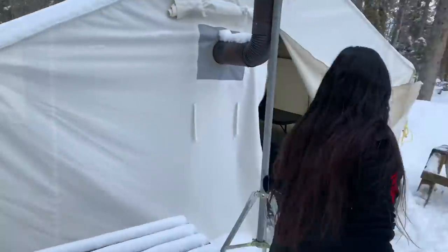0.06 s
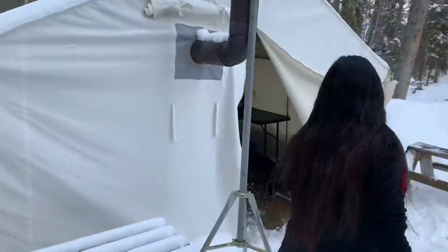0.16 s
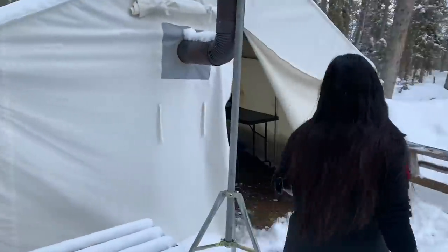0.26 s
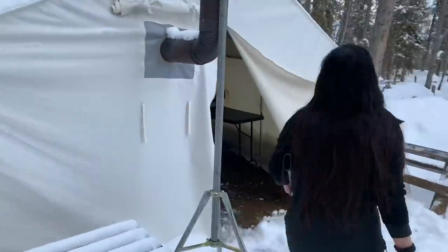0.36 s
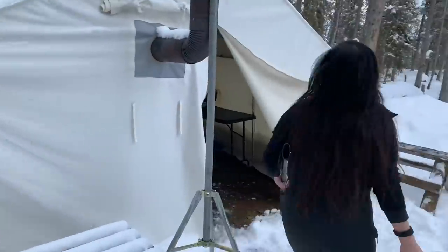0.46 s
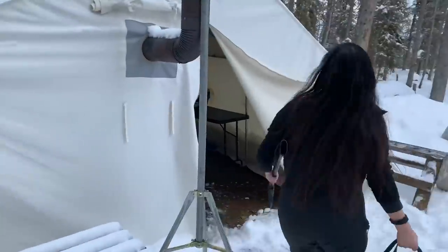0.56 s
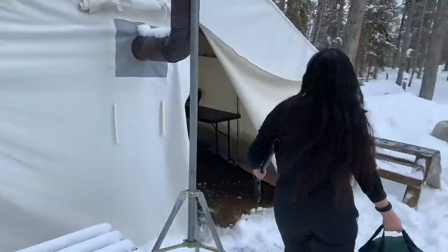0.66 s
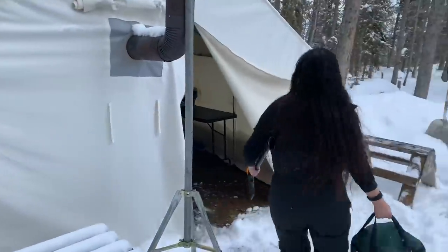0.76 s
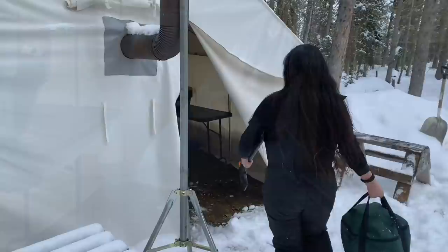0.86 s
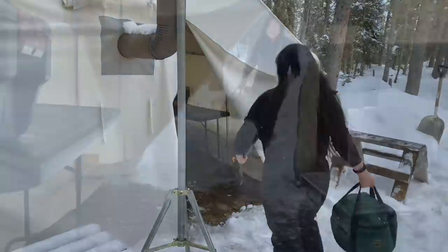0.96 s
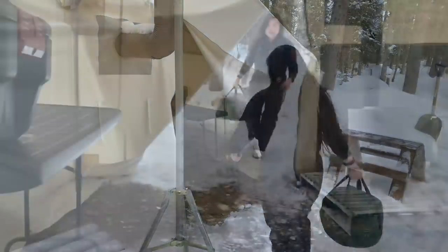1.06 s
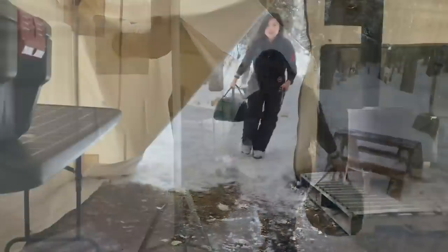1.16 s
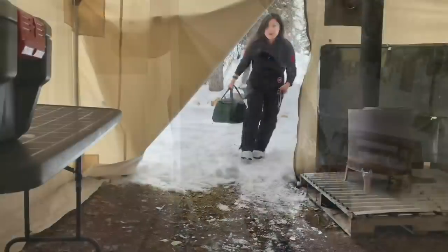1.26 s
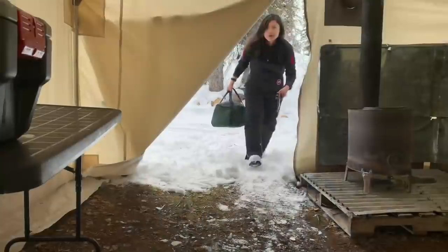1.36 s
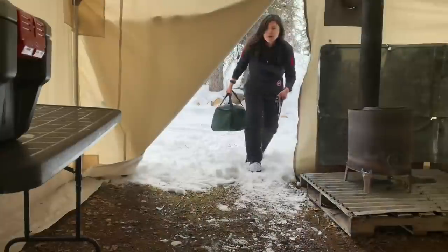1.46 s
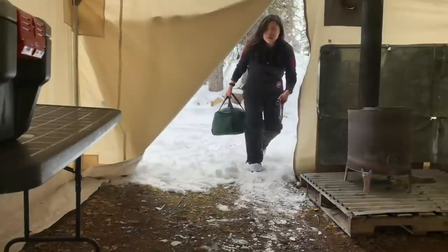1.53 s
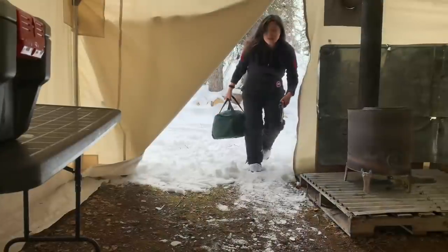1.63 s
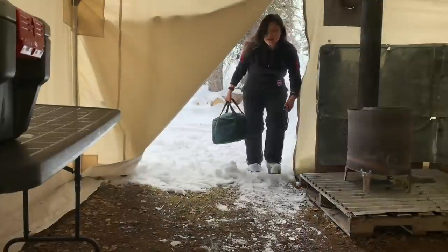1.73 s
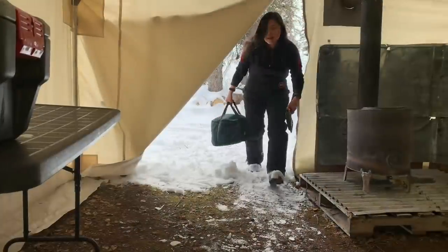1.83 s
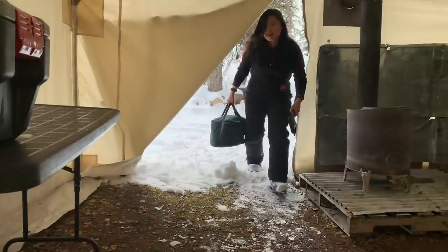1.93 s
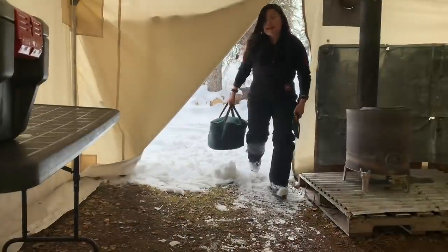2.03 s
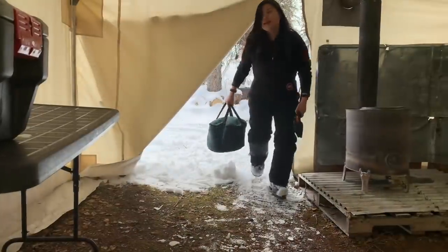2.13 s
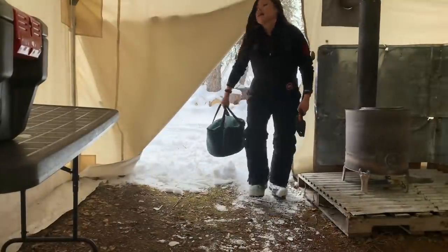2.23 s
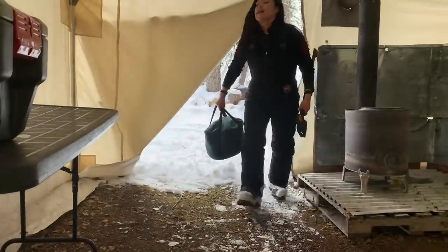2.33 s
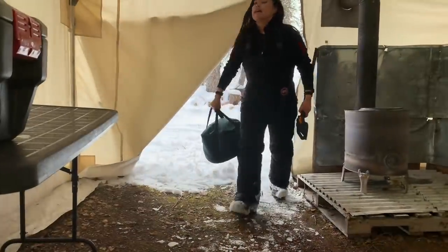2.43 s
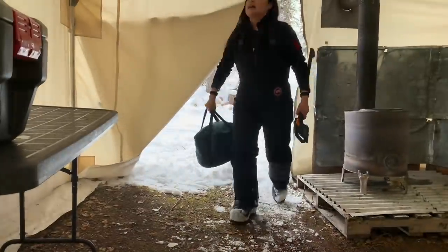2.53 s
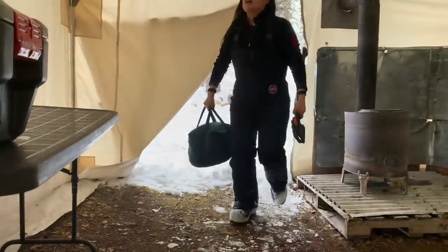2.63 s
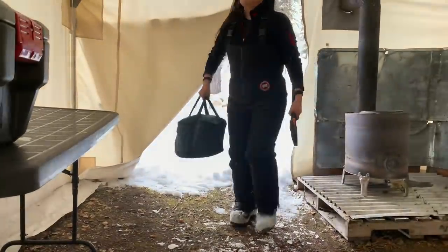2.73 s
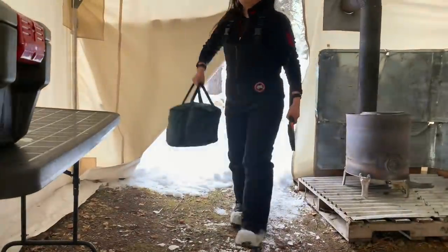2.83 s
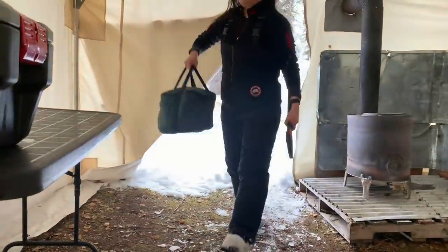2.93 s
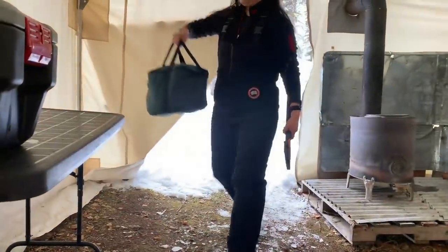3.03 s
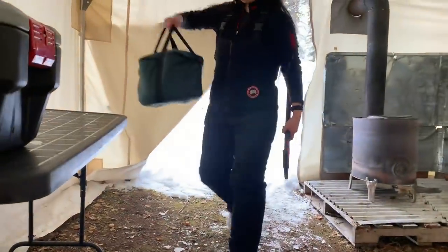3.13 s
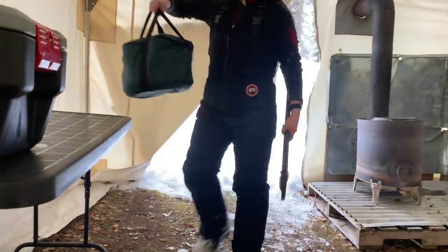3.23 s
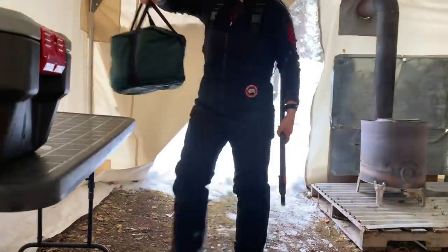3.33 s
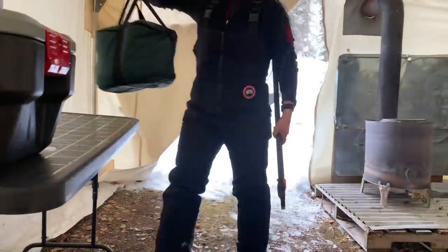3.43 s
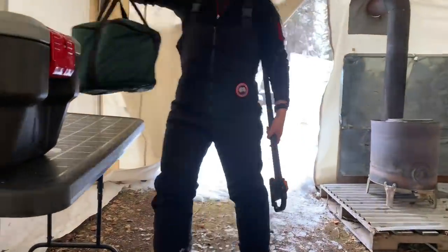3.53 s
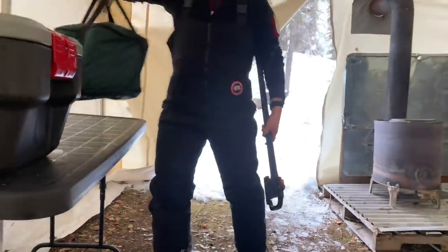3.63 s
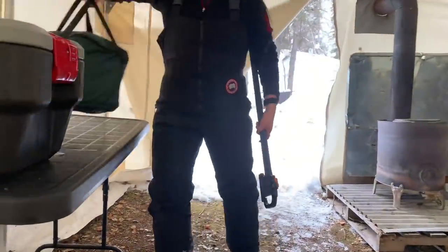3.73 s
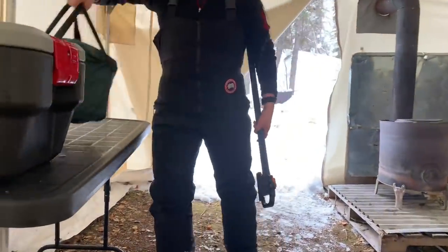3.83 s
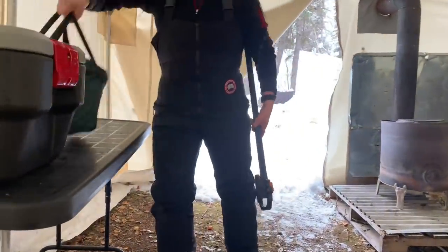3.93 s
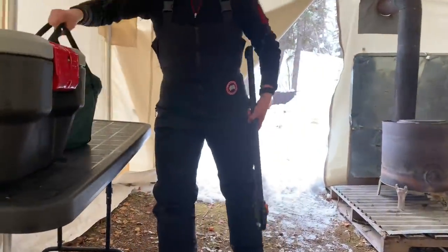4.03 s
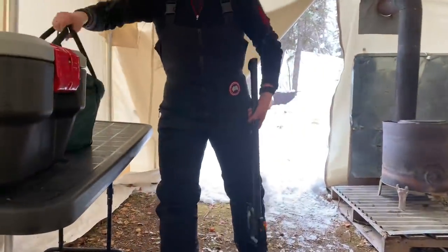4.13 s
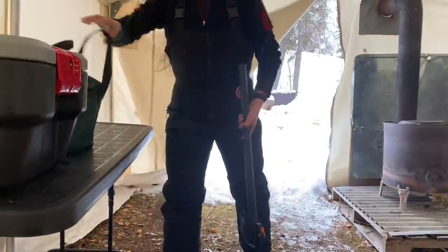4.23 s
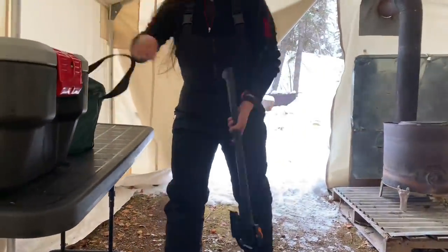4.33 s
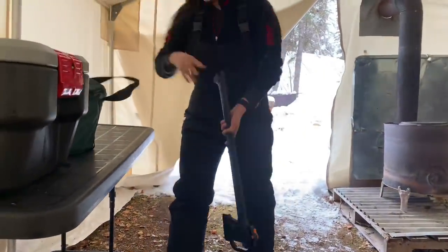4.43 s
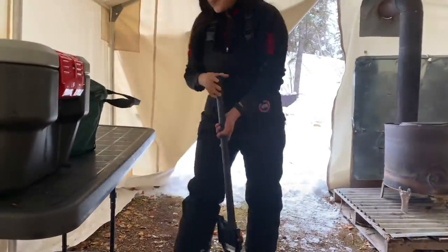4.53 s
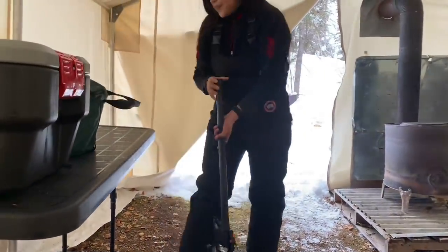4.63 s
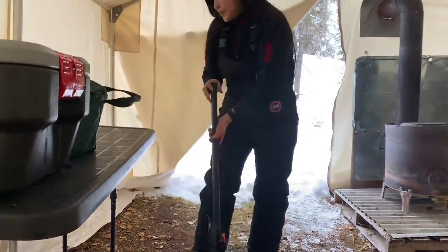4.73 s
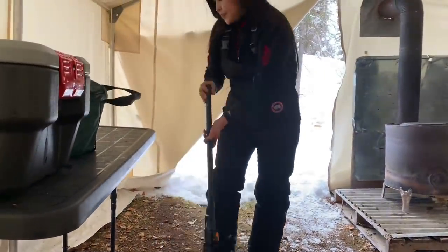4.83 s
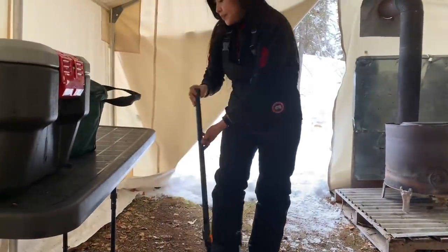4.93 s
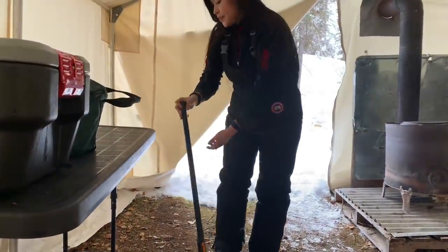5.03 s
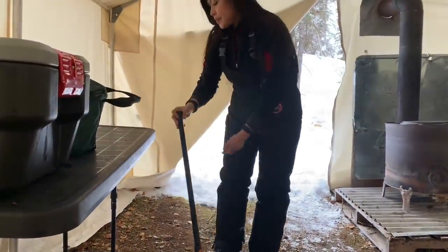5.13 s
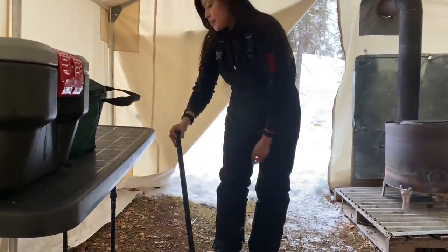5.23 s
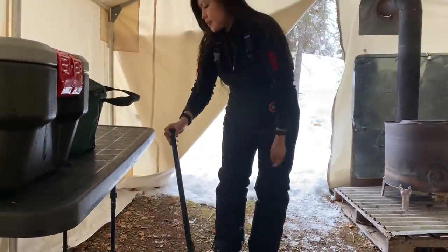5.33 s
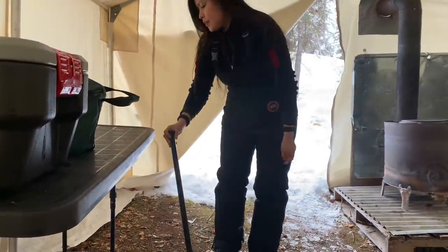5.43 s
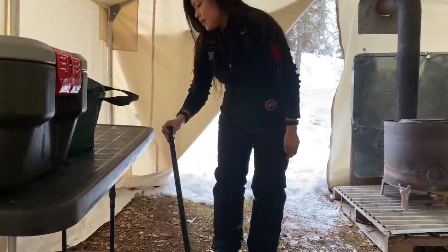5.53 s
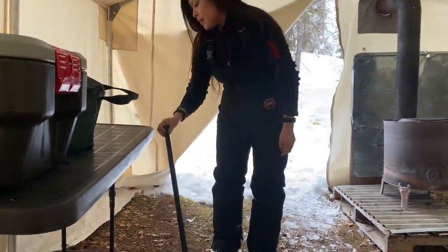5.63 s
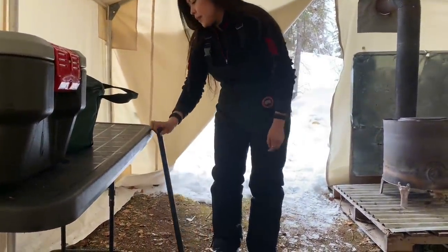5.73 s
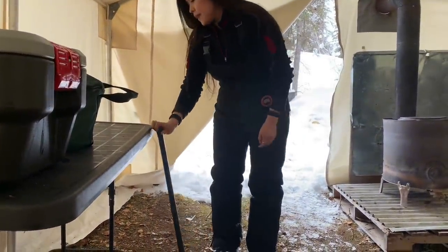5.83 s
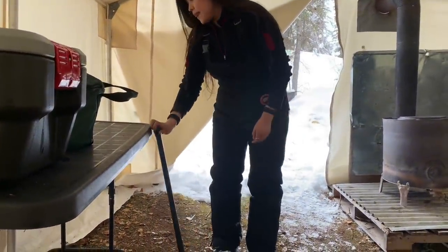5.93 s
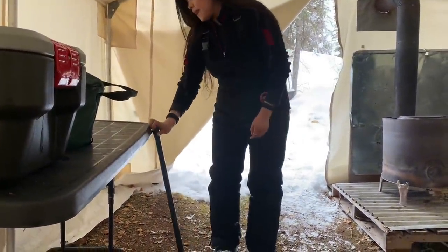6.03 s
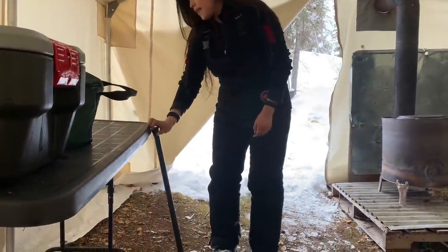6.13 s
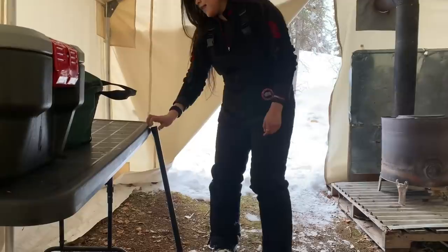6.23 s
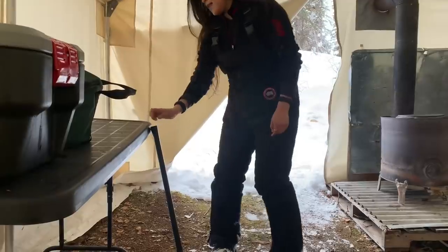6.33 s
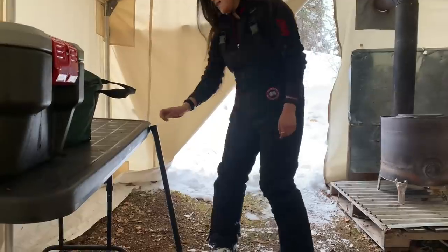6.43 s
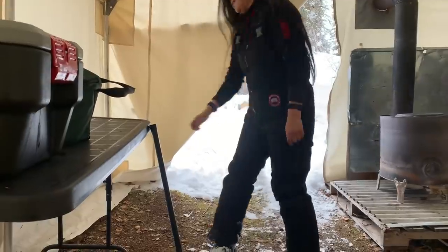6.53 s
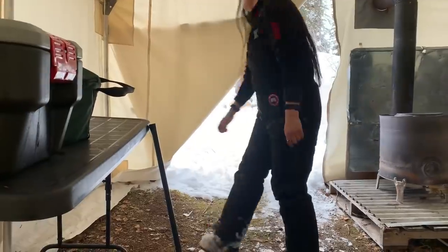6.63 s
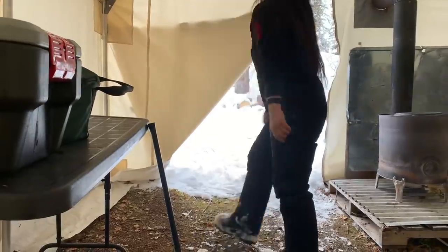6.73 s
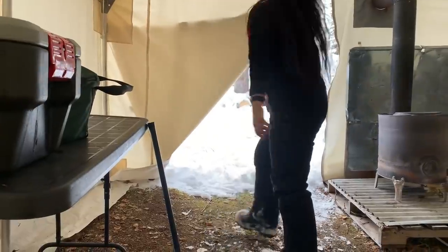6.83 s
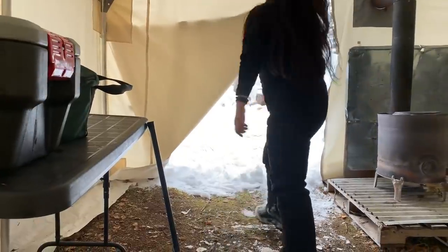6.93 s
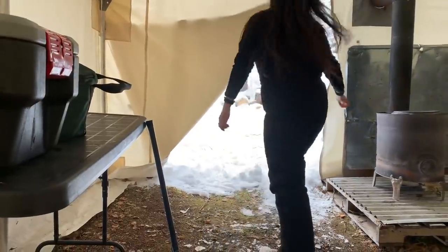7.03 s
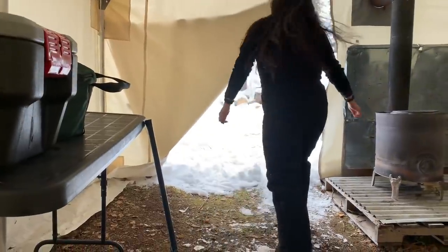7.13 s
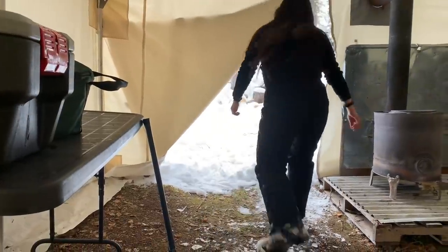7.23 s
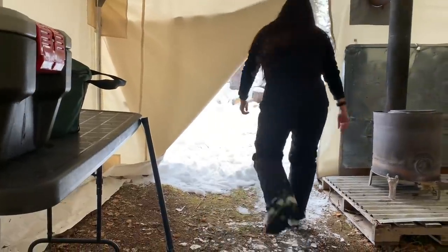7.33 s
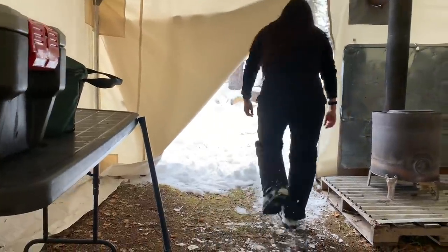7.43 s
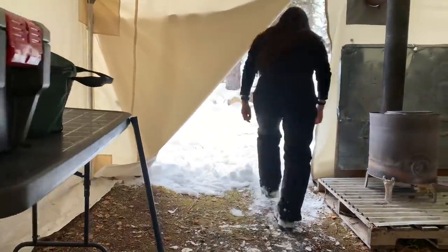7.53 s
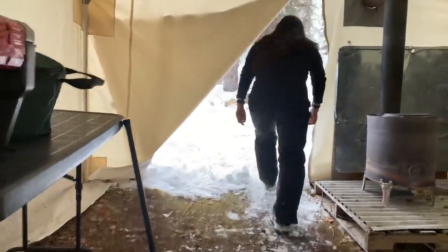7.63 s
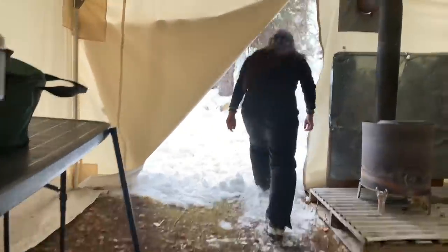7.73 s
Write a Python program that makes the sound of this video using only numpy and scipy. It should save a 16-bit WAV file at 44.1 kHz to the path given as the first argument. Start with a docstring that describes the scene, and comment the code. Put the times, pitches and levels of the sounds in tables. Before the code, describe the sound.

Someone in heavy winter clothing walks from crunchy snow onto frozen earth in a tent. After a few thudding steps, a loaded bag slaps and bumps onto a hollow folding table, its contents clattering. Following a quieter pause, a long tool gives hard cracks and short rattling rings on the ground. Small taps and ticks follow, then scuffing steps and swishing cloth. Near stereo pickup, nearly silent background, little reverberation.

```python
"""Boots cross packed snow, which crumps, then frozen ground, which thuds under the slap of the sole.
Grains of ice and grit fracture underfoot, while the walker's heavy clothes flap, rub and hiss.
A full bag lands on a plastic folding table, exciting its modes and clattering with its contents.
A long tool is knocked against the ground (crack, modal ring, rattle) and leant on the table edge.
The steps resume. Short tails stand for a canvas tent; faint coloured noise is the winter air."""
import sys
import numpy as np
from scipy import signal
from scipy.fft import rfft, irfft, next_fast_len
from scipy.io import wavfile
from scipy.ndimage import uniform_filter1d

SR = 44100
rng = np.random.default_rng(int(sys.argv[2]) if len(sys.argv) > 2 else 0)


def log_audio(samples):
    """Write samples as a 16-bit WAV file to the path given in sys.argv[1]."""
    # one column per channel
    frames = np.atleast_2d(samples).T
    # limit to full scale, then quantise
    limited = np.clip(frames, -1, 1)
    pcm = np.round(limited * 32767).astype(np.int16)
    wavfile.write(sys.argv[1], SR, pcm)


N = 342216
TIME = np.arange(N) / SR
# Levels in the tables are relative: each layer adds its own offset. t60 is the time to decay by 60 dB.

# boots packing the snow: [t/s, level/dB, pitch f/Hz]
CRUMPS = [(0.044, -35.5, 239), (0.097, -33.5, 259), (0.135, -32.5, 237), (0.460, -37.5, 261),
          (0.55, -34.5, 268), (0.614, -34, 268), (0.654, -49, 205), (0.983, -49, 270), (1.083, -44.5, 364),
          (1.278, -45, 175), (1.315, -34, 512), (1.418, -41.5, 420), (1.743, -34.5, 505), (1.893, -45, 703)]
# footfalls on frozen ground: [t/s, roll from heel to sole/s, delay of the weight/s, thud level/dB,
# thud f/Hz, sole slap level/dB, fine grit level/dB, coarse grit level/dB]
STEPS = [(1.814, 0.0036, 0.0038, -33, 140, -44.5, -64, -46),
         (2.287, 0.0063, 0.029, -31, 86, -28, -35.5, -35.5),
         (2.824, 0.027, 0.015, -30.5, 95, -25, -25, -37.5),
         (2.949, 0.0049, 0.0063, -43, 117, -38, -41.5, -54),
         (3.304, 0.03, 0.0047, -22.5, 157, -23, -41, -33.5),
         (4.264, 0.005, 0.0035, -48.5, 122, -44.5, -45, -73),
         (4.872, 0.004, 0.0064, -58, 115, -38, -48, -43),
         (6.442, 0.01, 0.0068, -32.5, 110, -36.5, -40, -41.5),
         (7.018, 0.00284, 0.0033, -33, 129.5, -34.5, -64, -46),
         (7.2, 0.0052, 0.0031, -56, 115, -48, -28, -47), (7.407, .022, .016, -51, 109, -31.5, -27, -60),
         (7.687, 0.0043, .003, -41.5, 75.5, -45.5, -57, -50)]
CRUMP_T60_S, THUD_T60_S = 0.19, 0.22
SLAP_HZ, SLAP_T60_S = 280.3, 0.15


def boots():
    """Yielding contact: snow packs with a hollow crump, frozen earth thuds and the sole slaps."""
    crumps = [(s, db, hz, CRUMP_T60_S) for s, db, hz in CRUMPS]
    contacts = []
    for s, roll_s, weight_s, thud_db, thud_hz, slap_db, _, _ in STEPS:
        contacts.append((s + weight_s, thud_db, thud_hz, THUD_T60_S))
        contacts.append((s + roll_s, slap_db, SLAP_HZ, SLAP_T60_S))
    # spectra: (multiple of pitch, dB)
    snow_colour = [(.23, 12.5), (.55, 6), (1, 9.5), (1.65, -3.5), (3.2, -24.5), (6, -30)]
    earth_colour = [(.2, -9), (.4, -3.5), (.9, 4), (1.8, -24), (3.2, -21.5), (7.5, -36)]
    snow = yielding_contacts(crumps, snow_colour, push_db=-0.5, crush_db=-4.5,
                             swell_share=0.029, rise_s=0.00032, sag_octaves_per_s=16.8)
    earth = yielding_contacts(contacts, earth_colour, push_db=-4.5, crush_db=-7.5,
                              swell_share=0.034, rise_s=0.0026, sag_octaves_per_s=14.2)
    return tent(snow, wet_db=-11.5, wide_hz=1100) + tent(earth, wet_db=-10.5, wide_hz=900)


# soles sliding through loose snow and grit:
# [t/s, attack/s and hold/s (attack: a rise of 60 dB), fine grain level/dB, coarse grain level/dB]
SLIDES = [(0.332, 0.2, 0.12, -51, -55.5), (0.786, 0.12, 0.11, -54, -53), (0.868, 0.14, 0.034, -38, -48),
          (1.101, 0.03, 0.051, -44.5, -56), (1.625, 0.14, 0.035, -41.5, -51), (1.803, 0.32, 0.12, -57, -72),
          (1.898, 0.26, 0.046, -51.5, -48), (2.587, 0.11, 0.043, -55, -56.5),
          (3.091, 0.16, 0.12, -55.5, -63.5), (6.106, 0.049, 0.075, -62.5, -62.5),
          (7.429, 0.012, 0.015, -40.5, -44.5)]
# spectra of fine and coarse grains: [f/Hz, level/dB per Hz]
FINE = [(1500, -2), (3000, -2.5), (4500, -2), (5800, -2.5), (7000, 1.5), (10500, 3), (14000, 0),
        (16000, -10.5)]
COARSE = [(150, 2), (400, 2.5), (900, 3), (1500, -2.5), (2400, -6), (4000, -9.5), (8000, -24.5)]
CRACKLES_PER_S, CRACKLE_DB = 120, -3.5  # larger crystals snap singly; dB offset on the coarse column


def crunch():
    """Fracture noise: ice crystals and grit break under the soles, in slides and sudden treads."""
    fine = shimmer(noise(FINE, 2500), spread_db=2.5) * grains(2500, spread_db=2.5)
    coarse = shimmer(noise(COARSE, 1500), spread_db=4.0) * grains(1000, spread_db=1.0)
    snaps = noise([(600, -12), (1500, -3.5), (3500, -1.0), (7000, -12)], 1500)
    snaps = snaps * grains(CRACKLES_PER_S, spread_db=5.5)

    s, attack, hold, fine_db, coarse_db = np.transpose(SLIDES)
    slides = fine * strokes(s, attack, hold, fine_db + 5.0)
    slides += coarse * strokes(s, attack, hold, coarse_db + 0.5)
    slides += snaps * strokes(s, attack, hold, coarse_db + CRACKLE_DB)

    s, roll, _, _, _, _, fine_db, coarse_db = np.transpose(STEPS)
    steps = fine * treads(s, roll, fine_db - 9.5, rise_s=0.00033)
    steps += coarse * treads(s, roll, coarse_db - 7.0, rise_s=0.00057)
    return tent(slides + steps, wet_db=-6.5, wide_hz=900)


SLIDE_RELEASE_S = 0.096  # a fall of 60 dB


def strokes(times, attacks, holds, levels_db):
    """Exponential growth and decay: slides swell, hold and fade, and the loudest one prevails."""
    out = np.zeros(N)
    for s, attack, hold, db in zip(times, attacks, holds, levels_db):
        away = np.maximum((s - TIME) / attack, (TIME - s - hold) / SLIDE_RELEASE_S)
        out = np.maximum(out, from_db(db - 60 * np.clip(away, 0, 2)))
    return out


GRIT_T60_S, SOLE_GRIT_DB = 0.25, -9.5  # the sole crushes grit again, weaker than the heel


def treads(times, rolls, levels_db, rise_s):
    """Power addition: grit is crushed by the heel and again as the sole comes down."""
    t60 = np.full(len(times), GRIT_T60_S)
    heel = blows(times, levels_db, t60, rise_s)
    sole = blows(times + rolls, levels_db + SOLE_GRIT_DB, t60, rise_s)
    return np.hypot(heel, sole)


# clumps of crust and grit giving way: [t/s, level/dB, centre f/Hz]
CRACKS = [(1.900, -37.5, 900), (2.29, -42, 3000), (2.468, -49, 2800), (2.827, -38, 4800),
          (2.841, -39.5, 1580), (2.862, -47, 2800), (2.949, -51, 1500), (3.304, -38.5, 2400),
          (3.337, -37, 2400), (5.746, -40.5, 3000), (4.945, -48, 2200), (6.162, -52, 3520),
          (6.519, -55, 4000), (7.201, -41.5, 2600), (7.649, -44.5, 2600)]
CRACK_T60_S, CRACK_RISE_S = 0.037, 0.00059


def cracks():
    """Brittle failure: a clump gives way in a short spray of fractures around its own pitch."""
    out, t = np.zeros((2, N)), TIME[:SR // 8]
    envelope = from_db(-60 * t / CRACK_T60_S) * (1 - np.exp(-t / CRACK_RISE_S))
    colour = [(.25, -6), (1, 0.5), (1.8, -11), (3.5, -13.5)]  # (multiple of pitch, dB)
    for s, db, hz in CRACKS:
        spray = noise([(hz * ratio, level) for ratio, level in colour], 1500, size=len(t))
        add(out, s, from_db(db) * spray * envelope)
    return tent(out * grains(1220, spread_db=2.0), wet_db=-1, wide_hz=900)


# hard taps of the tool, of kicked stones and of cracking crust: [t/s, level/dB, pitch f/Hz]
TAPS = [(0.090, -43.5, 940), (0.551, -48, 750), (1.316, -44, 950), (2.234, -41.5, 2130), (2.468, -43, 1100),
        (2.481, -40.5, 660), (2.861, -29.5, 594), (2.909, -37.5, 1230), (2.982, -44.5, 850),
        (4.914, -41, 460), (4.928, -39.5, 525), (4.945, -48, 330), (5.971, -44.5, 520), (6.456, -28, 1360),
        (6.963, -46.5, 400), (7.083, -42.5, 306), (7.020, -42.5, 1350), (7.129, -39.5, 1400),
        (7.132, -35.5, 3900), (7.181, -36, 1200)]
TAP_T60_S, TAP_REF_HZ, TAP_DAMPING = 0.069, 1010, 0.95  # t60 at the reference; power of its fall with f


def taps():
    """Frequency-dependent damping: one quick swing and a rattle; the higher, the sooner it dies."""
    rows = [(s, db, hz, TAP_T60_S * (TAP_REF_HZ / hz) ** TAP_DAMPING) for s, db, hz in TAPS]
    colour = [(.3, -7), (.7, -2), (1.1, -8.5), (1.7, -15.5), (4, -23.5)]
    hits = yielding_contacts(rows, colour, push_db=-1.0, crush_db=-8.5,
                             swell_share=0.0079, rise_s=0.00093, sag_octaves_per_s=5)
    return tent(hits, wet_db=-4, wide_hz=1200)


# swishes of sleeves, straps, soles and the sliding tool: [t/s at the loudest, level/dB, centre f/Hz,
# half length/s (standard deviation), half width/octaves (10 dB down), glide/octaves per s]
SWISHES = [(0.374, -46.5, 2050, 0.026, 0.53, -3.5), (0.388, -49, 580, 0.014, .28, 0),
           (0.808, -44.5, 3300, 0.024, .32, 2), (0.883, -42, 1920, 0.021, 0.44, -0.5),
           (0.884, -37.5, 3600, 0.019, 0.49, 1.5), (2.075, -55, 790, 0.037, 0.29, 1),
           (3.138, -54.5, 690, 0.029, 0.35, 3), (4.09, -49.5, 2600, 0.025, 0.21, 0),
           (4.68, -58.5, 2120, 0.021, .07, 0), (4.931, -51, 350, 0.019, 0.89, -3),
           (5.857, -68, 1620, 0.067, .07, 0), (5.85, -73, 2500, 0.061, .08, -0.5),
           (7.44, -38.5, 2110, 0.011, .06, 0.5), (7.434, -42.5, 4170, 0.013, .1, 1)]


def swishes():
    """Friction noise: a sliding contact sings in a narrow band that swells, glides and fades."""
    out, t = np.zeros((2, N)), TIME[:SR // 2]
    from_peak = t - t.mean()
    shape = [(-3.6, -24), (-1, -10), (0, 0), (1, -10), (3.6, -24)]  # (half widths, dB)
    for s, db, hz, half_s, width, glide in SWISHES:
        skirts = [(hz * 2 ** (k * width), level) for k, level in shape]
        band = noise(skirts, 1000, size=SR)
        # reading the noise ever faster or slower makes its pitch glide
        place = np.cumsum(2 ** (glide * np.clip(from_peak, -2 * half_s, 2 * half_s)))
        band = np.array([np.interp(place, np.arange(SR), ear) for ear in band])
        add(out, s - t.mean(), band * from_db(db) * np.exp(-(from_peak / half_s) ** 2 / 2))
    return out


# how briskly the walker moves: [t/s, rubbing cloth level/dB, flapping folds level/dB]
EFFORT = [(0.0, -58.5, -58), (0.85, -63.5, -63.5), (1.23, -65.5, -66.5), (1.5, -59.5, -59),
          (1.95, -62.5, -57.5), (2.15, -64, -89), (2.45, -57.5, -61.5), (2.75, -62.5, -74),
          (3.05, -60, -64.5), (3.6, -63.5, -64), (4.4, -60.5, -92), (4.98, -66, -64), (5.13, -77.5, -88.5),
          (5.7, -72, -90), (5.95, -74, -65.5), (6.09, -61, -63.5), (6.8, -65.5, -73), (7.45, -55, -55),
          (7.76, -55.5, -54)]
# trouser legs and sleeves brushing past each other:
# [t/s at the loudest, level/dB, half length/s (standard deviation)]
BRUSHES = [(1.715, -56.5, 0.041), (2.077, -59, 0.044), (3.43, -65.5, 0.18), (3.694, -58, 0.027),
           (4.226, -61, 0.066), (4.42, -60, 0.07), (6.258, -60.5, 0.047), (7.274, -66, 0.13),
           (7.584, -54.5, 0.17)]
# small ticks of buckles and stones: [t/s, level/dB]
TICKS = [(0.267, -32.5), (3.463, -31), (3.7755, -36), (4.451, -32.5), (6.109, -35), (6.519, -27),
         (7.723, -29.5)]
# spectra of flapping folds, rubbing cloth and hissing weave: [f/Hz, level/dB per Hz]
FOLDS = [(30, -3), (70, 3.5), (180, 2.5), (450, 2), (750, -3.5), (1300, -4.5), (3000, -27)]
RUB = [(400, 4), (900, -1.5), (1800, -4), (3000, -10), (5000, -12.5), (9000, -66)]
HISS = [(2000, -0.5), (3800, -1.5), (6800, -1.5), (10500, -3), (14000, -5.5), (16000, -23.5)]
SHAKE_DB, SHAKE_S = 1.5, 0.13  # each footfall adds a swell of this height, delay and half length
HISS_DB = -4.5  # hiss of the weave, relative to the rubbing


def clothes():
    """Friction of textiles: folds flap, cloth rubs and hisses, more after each footfall; ticks."""
    shake = from_db(SHAKE_DB * sum(swell(s + SHAKE_S, SHAKE_S) for s, *_ in STEPS))
    rub, folds = shake * np.array(gains(EFFORT))
    brushes = sum(from_db(db) * swell(s, half_s) for s, db, half_s in BRUSHES)
    hiss = np.hypot(from_db(HISS_DB) * rub, brushes)
    rustle = folds * shimmer(noise(FOLDS, 600), spread_db=3.5) * grains(350, spread_db=2.5)
    rustle += rub * shimmer(noise(RUB, 900), spread_db=3.5) * grains(1500, spread_db=2)
    rustle += hiss * shimmer(noise(HISS, 900), spread_db=2.5) * grains(4000, spread_db=2.5)
    s, db = np.transpose(TICKS)
    ticks = noise(FINE, 1500) * blows(s, db - 12.0, np.full(len(s), .015), rise_s=0.00073)
    return rustle + tent(ticks, wet_db=0.0, wide_hz=700)


# the bag landing and settling: [t/s, table ring level/dB, most excited f/Hz, thump level/dB,
# clatter level/dB, clatter t60/s]
BAG = [(3.935, -41, 550, -22.5, -26.5, 0.16), (3.950, -32, 100.6, -26, -41, 0.15),
       (3.979, -53, 120, -26.5, -34, 0.14), (4.001, -51, 110, -38, -35, 0.067),
       (4.059, -49, 600, -35.5, -44, 0.24), (4.122, -53.5, 140, -59, -63, 0.1)]
# the bag's nylon skidding on the table: [t/s, level/dB]
SKID = [(3.78, -72), (3.86, -53.5), (3.925, -38.5), (3.97, -39), (4.02, -38), (4.07, -44.5), (4.14, -59.5),
        (4.22, -81)]
# hard things in the bag knocking on the table through the cloth: [t/s, level/dB, pitch f/Hz]
BUMPS = [(3.940, -19, 755), (3.950, -20, 280), (3.956, -20, 240), (3.957, -22.5, 594), (3.981, -27, 620),
         (4.004, -34, 600), (4.059, -31.5, 640), (4.064, -29, 1130), (4.077, -30.5, 970)]
# modes of the table top: [f/Hz, level/dB, t60/s]
TABLE = [(56.7, -6, 0.34), (115.7, 0, 0.38), (155.4, 2.5, 0.2), (217.6, -11, 0.39), (259, 3, 0.12),
         (330, -12, 0.24), (400, -15, 0.25), (526, -8, 0.14), (591, 0.5, 0.14), (820, -21, .22),
         (910, -12.5, 0.21), (1109, -18.5, 0.17), (1360, -8.5, 0.091)]
# spectra of the thump, the contents, the skidding nylon and the slap: [f/Hz, level/dB per Hz]
THUMP = [(25, -24.5), (55, -1.5), (130, -2), (260, -12.5), (450, -14), (700, -16), (1500, -28.5),
         (4000, -54)]
CLATTER = [(200, -19.5), (550, 4), (1000, 4.5), (1500, -1), (2200, -4.5), (4000, -7.5), (7000, -21.5),
           (11000, -23), (16000, -38.5)]
NYLON = [(180, 3), (1100, 0), (1800, -1.5), (2700, -4.5), (4500, -6.5), (6500, 2.5), (7800, -3),
         (11000, -6), (14500, -9.5), (16000, -18)]
BAG_SLAP = [(300, -7), (800, -0.5), (1600, 8.5), (2300, -7.5), (3400, -3), (5000, -11.5), (7000, -6),
            (11000, -15), (16000, -28)]
BAG_SLAP_S, BAG_SLAP_DB, BAG_SLAP_T60_S = 3.929, -23.5, 0.11  # the bag's taut side slaps the table
BUMP_T60_S = 0.088
TABLE_LAG_S = 0.00033  # the table stands on the left, so the right ear hears the bag this much later


def bag():
    """Modal excitation: the bag skids, slaps and settles; the table booms, the contents clatter."""
    s, ring_db, centre_hz, thump_db, clatter_db, t60 = np.transpose(BAG)
    table = struck(TABLE, zip(s, ring_db - 2, centre_hz), boost_db=7.0, octaves=1.9,
                   scatter_db=2.5, wide_hz=800)
    thump = noise(THUMP, 900) * blows(s, thump_db - 0.5, np.full(len(s), .17), rise_s=0.0022)
    contents = shimmer(noise(CLATTER, 900), spread_db=4) * grains(700, spread_db=2)
    clatter = contents * blows(s, clatter_db, t60, rise_s=0.002)
    slap = shimmer(noise(BAG_SLAP, 930), spread_db=0.5)
    slap = slap * blows([BAG_SLAP_S], [BAG_SLAP_DB], [BAG_SLAP_T60_S], rise_s=0.0011)
    skid = gains(SKID)[0] * noise(NYLON, 610)
    rows = [(at, db, hz, BUMP_T60_S) for at, db, hz in BUMPS]
    bumps = yielding_contacts(rows, [(.4, 1), (1, -0.5), (1.8, -9.5), (4, -24)], push_db=-5.5,
                              crush_db=-8, swell_share=0.016, rise_s=0.0011, sag_octaves_per_s=5)
    leftward = (clatter + slap) * from_db([[1.2], [-1.2]])
    left, right = tent(table, wet_db=-3, wide_hz=700) + thump + bumps + leftward + skid
    return np.array([left, delayed(right, TABLE_LAG_S)])


# the tool's knocks: [t/s, rattle level/dB, crack level/dB, low body level/dB, t60/s, ring level/dB,
# most excited f/Hz]
KNOCKS = [(5.217, -30, -19, -41.5, 0.1, -46.5, 1460), (5.232, -26, -16.5, -39, 0.17, -42.5, 3540),
          (5.383, -35, -25, -61, 0.15, -44, 1720), (5.633, -32, -24.5, -61, 0.095, -44, 1570),
          (5.653, -36, -25.5, -49.5, 0.15, -47.5, 725), (5.720, -43.5, -38, -50.5, 0.22, -57, 3750),
          (5.746, -42.5, -28, -50.5, 0.18, -57.5, 2830)]
# modes of the tool's shaft and head: [f/Hz, level/dB, t60/s]
TOOL = [(421, -8, .13), (630, 2, .11), (718, -5, .13), (808, -2, .14), (880, -8, .1), (1090, -8, .1),
        (1436, -7, .11), (1540, -5, .1), (1572, -8, .12), (1695, -3, .13), (1755, -3, .14),
        (1976, -12, .11), (2770, -8, .1), (2880, -5, .11), (3690, -7, .08), (3752, -6, .12),
        (3828, -7, .11), (3910, -7, .12), (4254, -7, .14), (4390, -10, .11), (4813, -11, .15),
        (6620, -11, .14), (6800, -9, .12)]
# spectrum of the crack and rattle: [f/Hz, level/dB per Hz]
KNOCK = [(150, -35), (250, -27), (430, -4), (660, -1.5), (1150, -6.5), (1450, -3), (1720, -8), (2150, -5),
         (2750, -2.5), (3300, -7), (3770, -1.5), (5600, -9), (7000, -7), (10700, -9.5), (14000, -18),
         (16000, -27)]
# the handle coming to rest against the table edge: [t/s, level/dB, most excited f/Hz]
LEAN = (5.970, -55.5, 550)
GRIP_DETUNE = 0.0054  # grip and point of contact shift each mode by about this share


def tool():
    """Modal excitation: a knock cracks, rings by where it hits, and rattles; it leans at last."""
    s, rattle_db, crack_db, body_db, t60, ring_db, centre_hz = np.transpose(KNOCKS)
    # averaging over samples lets the contact build up over a few milliseconds
    crack = uniform_filter1d(blows(s, crack_db, np.full(len(s), .02), rise_s=0.0018), size=50)
    rattle = uniform_filter1d(blows(s, rattle_db, t60, rise_s=0.00061), size=400)
    impact = shimmer(noise(KNOCK, 200), spread_db=1.5) * np.hypot(crack, rattle)
    body_colour = [(70, -15), (190, 6.0), (300, -2.0), (550, -1.5), (800, -12.0), (1500, -26.0)]
    body = noise(body_colour, 650) * blows(s, body_db, t60, rise_s=0.0035)
    ring = struck(TOOL, zip(s, ring_db - 4.0, centre_hz), boost_db=8.5, octaves=0.26,
                  scatter_db=3.5, wide_hz=356, detune=GRIP_DETUNE)
    # the three lowest table modes stay silent
    lean = struck(TABLE[3:], [LEAN], boost_db=7.0, octaves=0.28, scatter_db=1.0, wide_hz=800)
    return impact + body + tent(ring + lean, wet_db=1.5, wide_hz=297)


# spectrum of the still winter air: [f/Hz, level/dB per Hz]
AIR = [(18, -49), (30, -10), (90, -13), (233, -16), (426, -25), (822, -24.5), (5590, -65.5), (14400, -37.5),
       (16000, -36.5)]
AIR_DB = -77


def winter_air():
    """Stationary noise: a faint, steady coloured bed."""
    return from_db(AIR_DB) * noise(AIR, 700)


def yielding_contacts(rows, spectrum, push_db, crush_db, swell_share, rise_s, sag_octaves_per_s):
    """Yielding contact: a push swells over a share of its t60 and sags in pitch, with crumbling."""
    out, t = np.zeros((2, N)), TIME[:SR // 3]
    for s, db, hz, t60 in rows:
        age = t / (swell_share * t60)
        phase = 2 * np.pi * np.cumsum(hz * 2 ** (-sag_octaves_per_s * t)) / SR
        push = age * np.exp(1 - age) * np.sin(phase)
        crush = noise([(hz * ratio, level) for ratio, level in spectrum], 880, size=len(t))
        crush = crush * from_db(-60 * t / t60) * (1 - np.exp(-t / rise_s))
        add(out, s, from_db(db + push_db) * push + from_db(db + crush_db) * crush)
    return out


def struck(modes, hits, boost_db, octaves, scatter_db, wide_hz, detune=0):
    """Modal superposition: a blow (t/s, level/dB, f/Hz) rings all modes, most those near its f."""
    out, t = np.zeros((2, N)), TIME[:SR // 2]
    hz, mode_db, t60 = np.array(modes).T[:, :, None]
    signs = (-1) ** np.arange(len(modes))
    # the higher modes reach the two ears out of step
    offset = rng.choice([-1, 1], hz.shape) * np.pi / 4 * hz ** 2 / (hz ** 2 + wide_hz ** 2)
    decay = from_db(mode_db - 60 * t / t60)
    for s, db, centre_hz in hits:
        phase = 2 * np.pi * hz * (1 + detune * rng.standard_normal(hz.shape)) * t
        rings = np.array([decay * np.sin(phase + ear * offset) for ear in (-1, 1)])
        favour = boost_db * np.exp(-(np.log2(hz[:, 0] / centre_hz) / octaves) ** 2)
        scatter = scatter_db * rng.standard_normal(len(modes))
        add(out, s, (signs * from_db(db + favour + scatter)) @ rings)
    return out


def grains(per_s, spread_db):
    """Shot noise: many small fractures of uneven size, each dying in about a millisecond."""
    sizes = from_db(spread_db * np.minimum(rng.exponential(1, N), 4))
    fractures = (rng.random(N) < per_s / SR) * sizes ** 2 + 1e-12
    power = signal.lfilter([1], [1, -np.exp(-1000 / SR)], fractures)
    return rms_one(np.sqrt(power))


def shimmer(x, spread_db, size=512):
    """Spectral modulation: patches a few hundred Hz wide swell and fade as a contact moves."""
    frames = signal.stft(x, nperseg=size)[2]
    field = rng.standard_normal(frames.shape[1:])
    field = uniform_filter1d(field, size=4, axis=0)
    field = rms_one(uniform_filter1d(field, size=7, axis=1))
    return rms_one(signal.istft(frames * from_db(spread_db * field), nperseg=size)[1][:, :N])


def noise(spectrum, wide_hz, size=N):
    """Interaural coherence: coloured noise, alike at both ears below wide_hz, drifting apart above."""
    length = next_fast_len(size)
    hz = np.fft.rfftfreq(length, 1 / SR) + 1
    points = np.array(spectrum)
    colour = from_db(np.interp(np.log(hz), np.log(points[:, 0]), points[:, 1]))
    # beyond its end points the spectrum falls by 12 dB per octave
    colour = colour * np.minimum(hz / points[0, 0], 1) ** 2 * np.minimum(points[-1, 0] / hz, 1) ** 2
    mid, side = rfft(rng.standard_normal((2, length))) * colour
    side = side * 0.92 * hz / np.hypot(hz, wide_hz)
    return rms_one(irfft([mid + side, mid - side], length)[:, :size])


def blows(times, levels_db, t60s, rise_s):
    """Power addition: blows rise fast, die away exponentially, and their powers add."""
    power, t = np.zeros(N), TIME[:SR // 2]
    for s, db, t60 in zip(times, levels_db, t60s):
        envelope = from_db(db - 60 * t / t60) * (1 - np.exp(-t / rise_s))
        add(power, s, envelope ** 2)
    return np.sqrt(power)


def swell(s, half_s):
    """Gaussian envelope: a smooth rise and fall around time s."""
    return np.exp(-np.minimum(((TIME - s) / half_s) ** 2, 60) / 2)


def gains(rows):
    """Logarithmic interpolation: each dB column becomes a gain over time, silent outside it."""
    s, *columns = np.transpose(rows)
    return [from_db(np.interp(TIME, s, c, left=-200, right=-200)) for c in columns]


def from_db(db):
    """Level law: decibels to an amplitude ratio."""
    return 10 ** (np.asarray(db) / 20)


def rms_one(x):
    """Normalisation: scale to unit mean power."""
    return x / np.sqrt(np.mean(x ** 2) + 1e-20)


def add(track, s, sound):
    """Superposition: mix a sound into a track at time s."""
    start = max(round(s * SR), 0)
    part = sound[..., :N - start]
    track[..., start:start + part.shape[-1]] += part


def delayed(x, lag_s):
    """Propagation delay: the same sound heard later, to the nearest sample."""
    return x[np.clip(np.arange(N) - np.round(lag_s * SR).astype(int), 0, N - 1)]


TENT_T60_S = 0.12


def tent(x, wet_db, wide_hz):
    """Reverberation: canvas and ground return a short, dense tail after a few milliseconds."""
    t = TIME[:SR // 3]
    tail = noise([(40, -42.5), (200, 1.0), (5000, 3.5), (16000, -2.5)], wide_hz, size=len(t))
    tail = tail * from_db(-60 * t / TENT_T60_S) * (t > .005)
    tail = tail / np.sqrt(np.sum(tail ** 2) / 2)
    return x + from_db(wet_db) * signal.oaconvolve(np.atleast_2d(x), tail, axes=1)[:, :N]


OUTSIDE_LAG_S, OUTSIDE_UNTIL_S = 0.00009, 0.9  # at first the walker is to the right: the left ear lags
OUTSIDE_WIDTH = 0.82  # with no canvas around, the two ears hear more nearly the same


def outside(x):
    """Interaural time difference: out on the snow, sound is narrower and comes from the right."""
    outdoors = TIME < OUTSIDE_UNTIL_S
    mid = (x[0] + x[1]) / 2
    side = (x[0] - x[1]) / 2 * np.where(outdoors, OUTSIDE_WIDTH, 1)
    return np.array([delayed(mid + side, OUTSIDE_LAG_S * outdoors), mid - side])


# the microphone pair: [f/Hz, lag of the left/radians, stereo width 0-1, left minus right level/dB]
PORTS = [(20, 0, 1, 0), (1500, 0, 1, 1), (5300, 0, 1, -4), (7000, 1.1, .6, 0), (8400, 3.14, .08, 0),
         (9500, 4.4, .46, 0), (10500, 6.2, .12, 0), (11500, 6.35, .12, 0), (12200, 7.6, .46, 0),
         (13300, 9.4, .08, 0), (14600, 10.7, .5, 0), (15200, 12.5, .15, 0)]


def microphones(x):
    """Phase difference: in the treble two close ports hear nearly the same, the left one later."""
    length = next_fast_len(N + SR // 10)
    hz = np.fft.rfftfreq(length, 1 / SR)
    points, *columns = np.transpose(PORTS)
    lag, width, balance_db = [np.interp(hz, points, c) for c in columns]
    left, right = rfft(x, length)
    mid, side = (left + right) / 2, (left - right) / 2 * width
    left_port = (mid + side) * from_db(balance_db / 2) * np.exp(-1j * lag)
    right_port = (mid - side) * from_db(-balance_db / 2)
    return irfft([left_port, right_port], length)[:, :N]


def scene():
    """Superposition: the walker, the bag and the tool sound over the still winter air."""
    walker = boots() + outside(crunch() + swishes()) + cracks() + clothes() + taps()
    return walker + bag() + tool() + winter_air()


CUTOFF_HZ = 15900


def record(dry):
    """Band limiting: the microphone pair picks it up; the deepest bass and the top are cut."""
    high_pass = signal.butter(4, 37, "high", fs=SR, output="sos")
    low_pass = signal.ellip(10, .1, 80, CUTOFF_HZ, fs=SR, output="sos")
    thin = signal.sosfilt(high_pass, microphones(dry))
    return signal.sosfilt(low_pass, thin)


dry = scene()
out = record(dry)
log_audio(out)
```